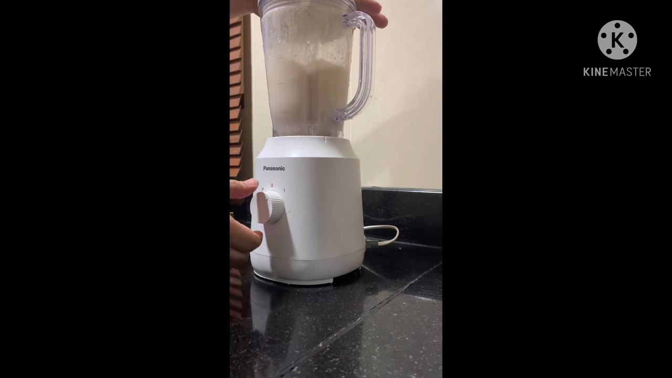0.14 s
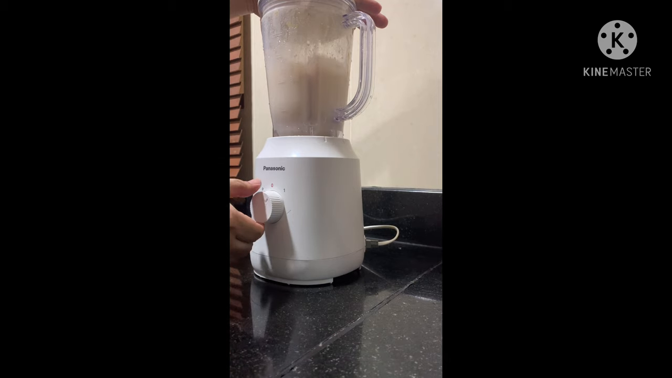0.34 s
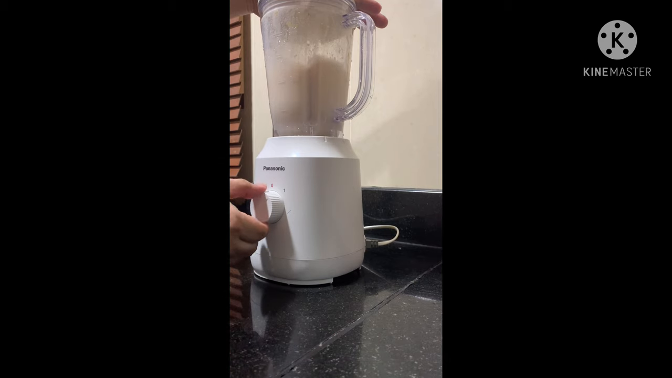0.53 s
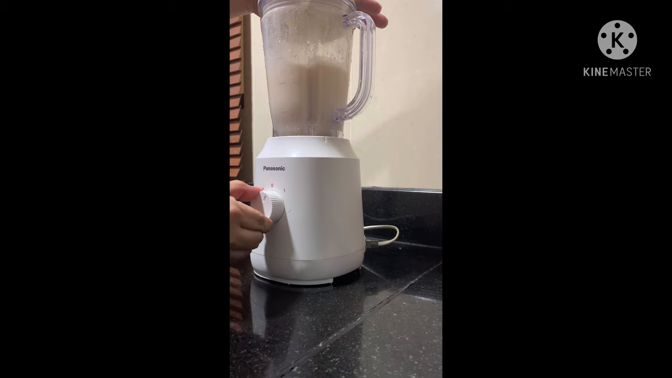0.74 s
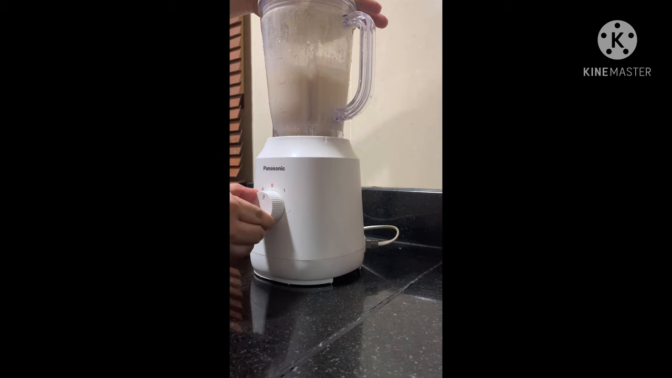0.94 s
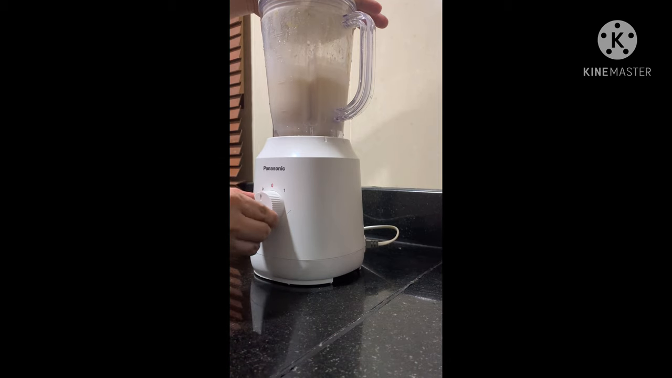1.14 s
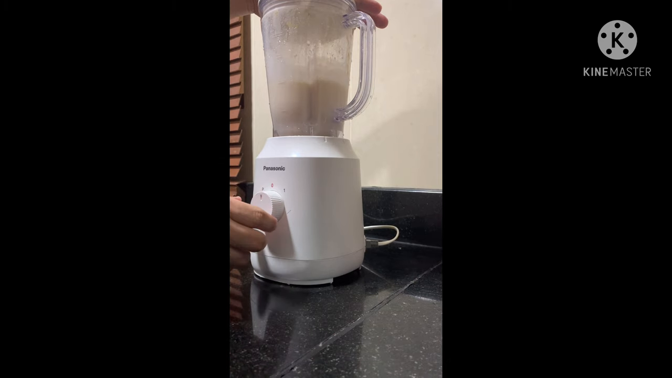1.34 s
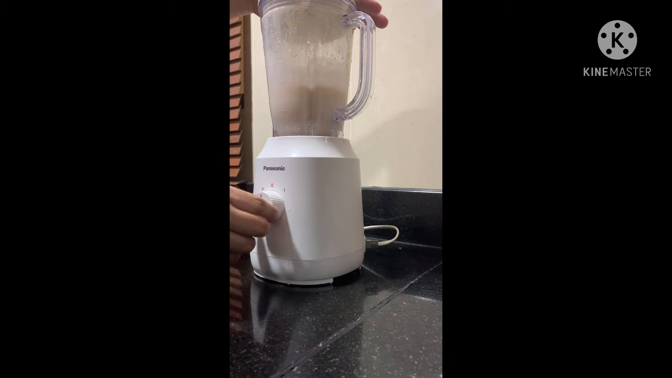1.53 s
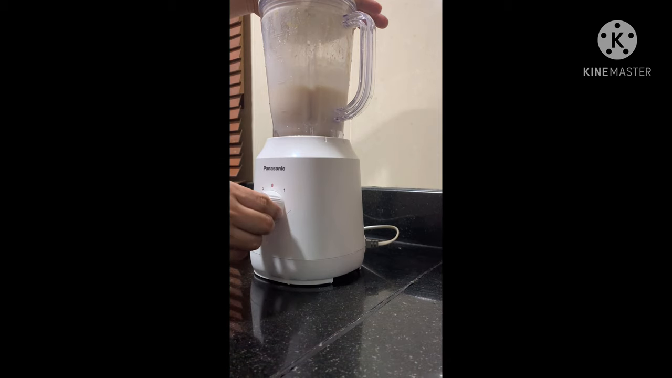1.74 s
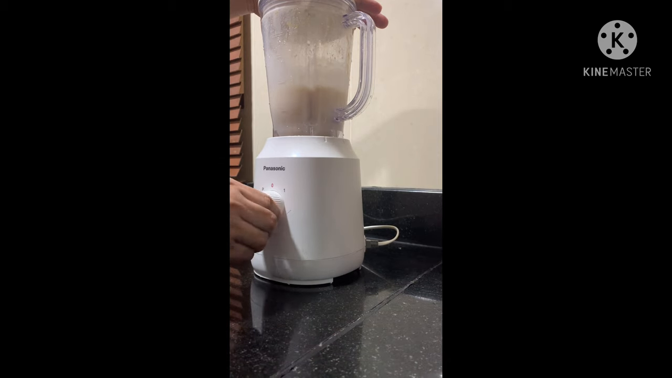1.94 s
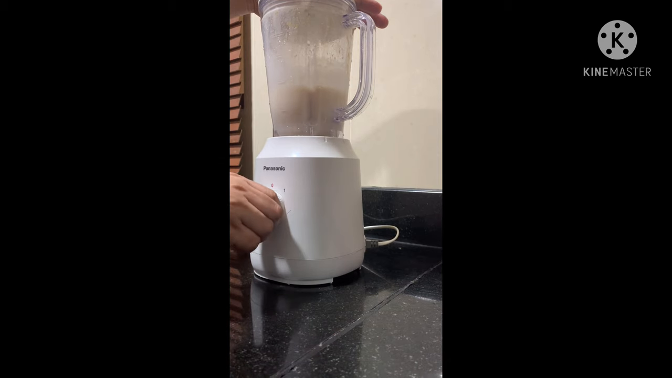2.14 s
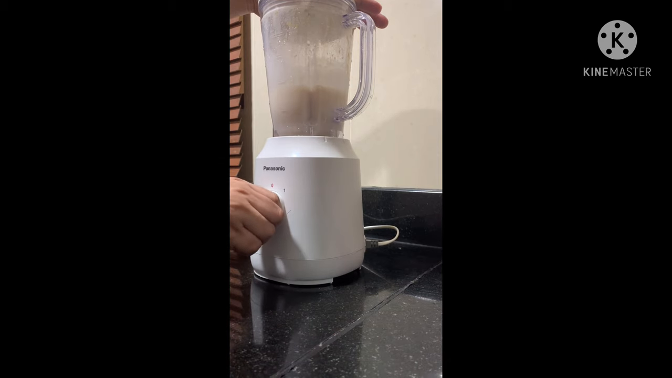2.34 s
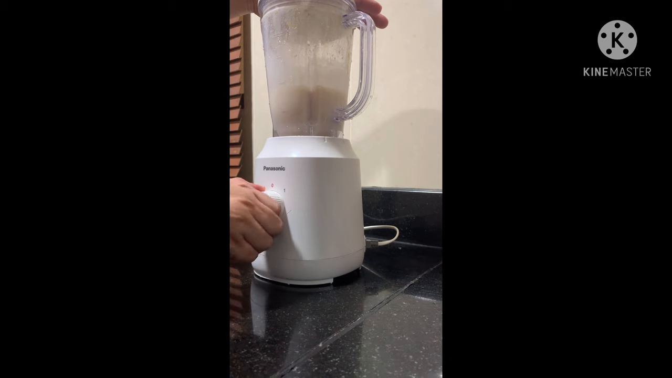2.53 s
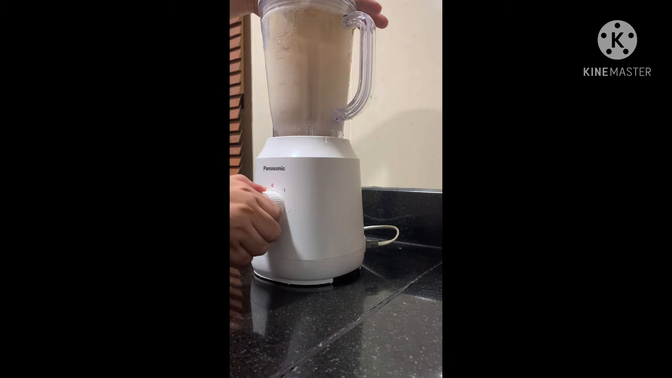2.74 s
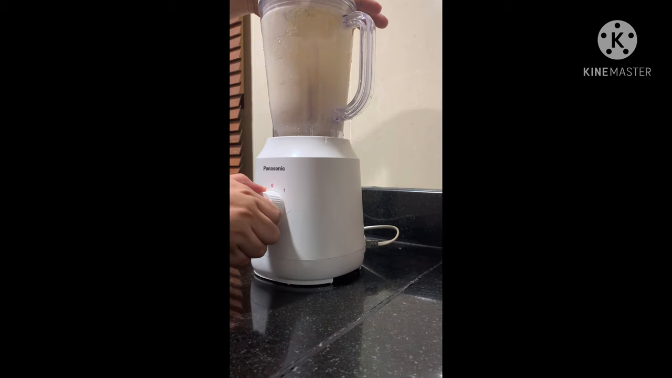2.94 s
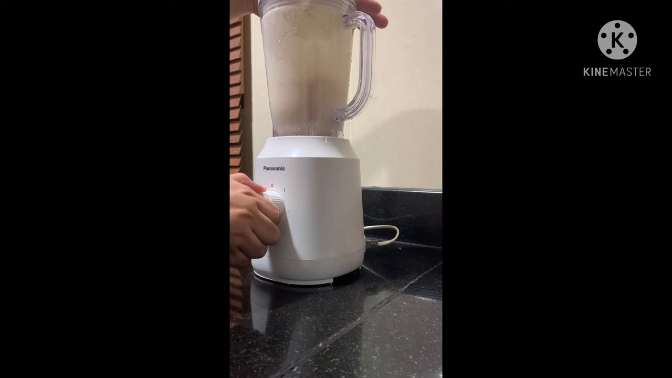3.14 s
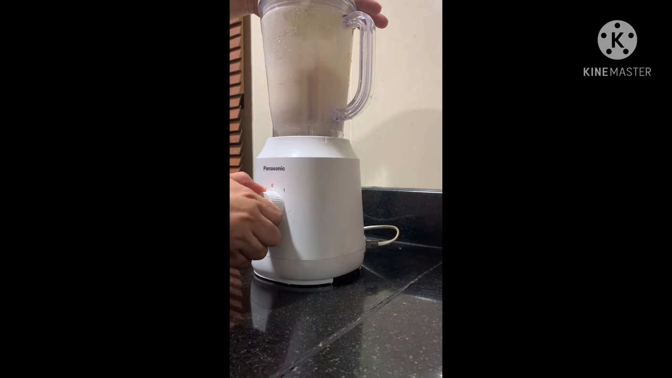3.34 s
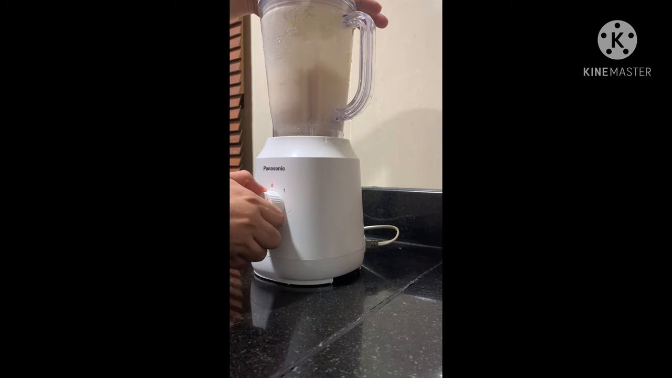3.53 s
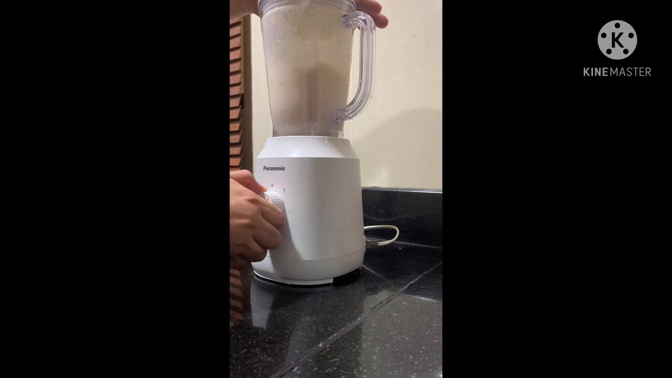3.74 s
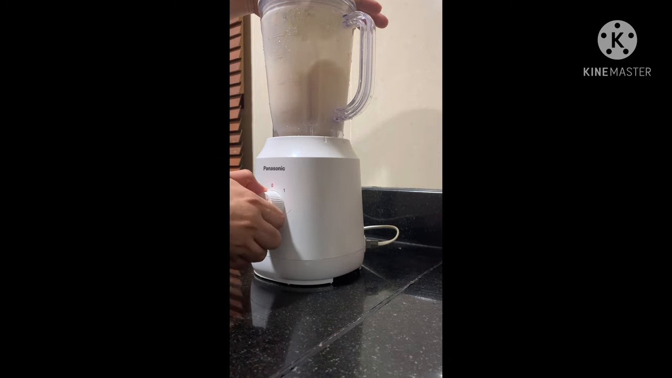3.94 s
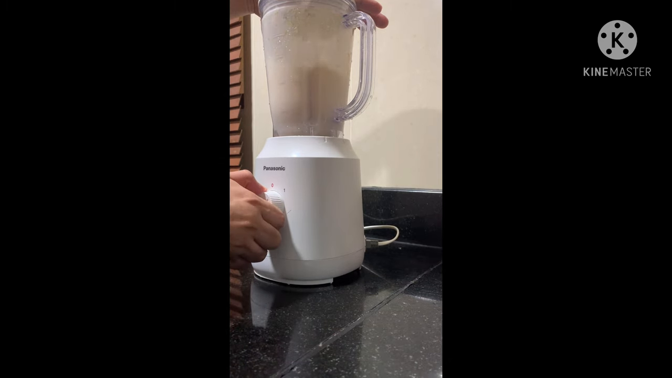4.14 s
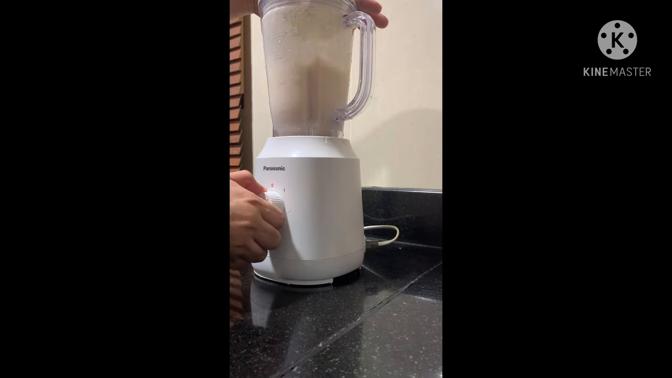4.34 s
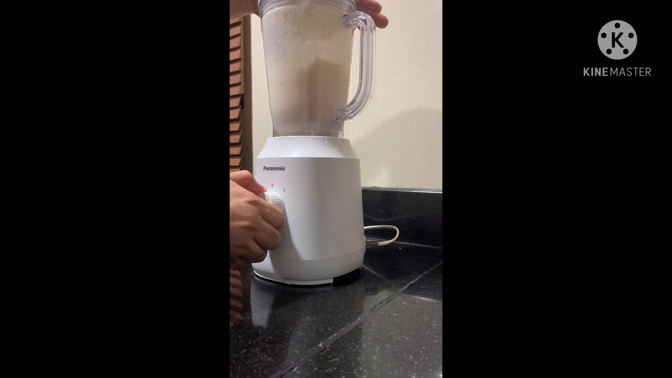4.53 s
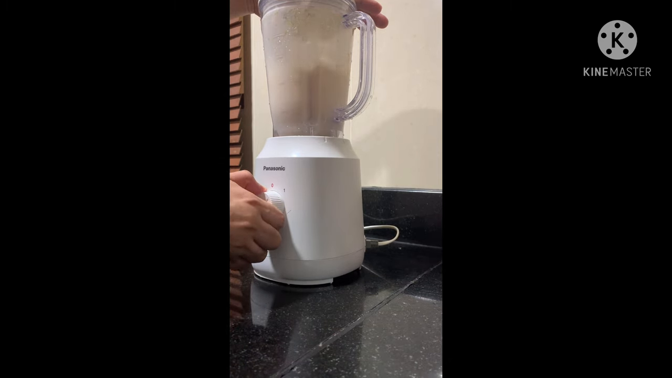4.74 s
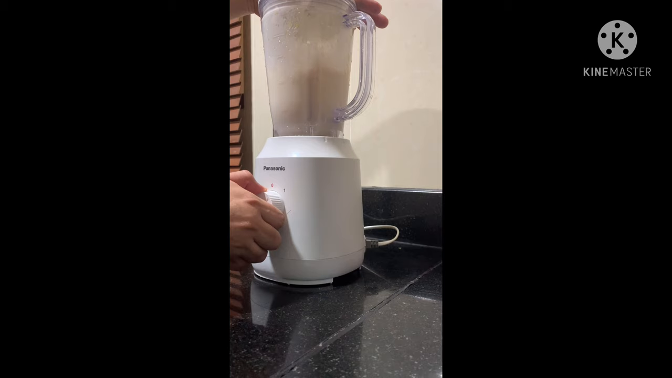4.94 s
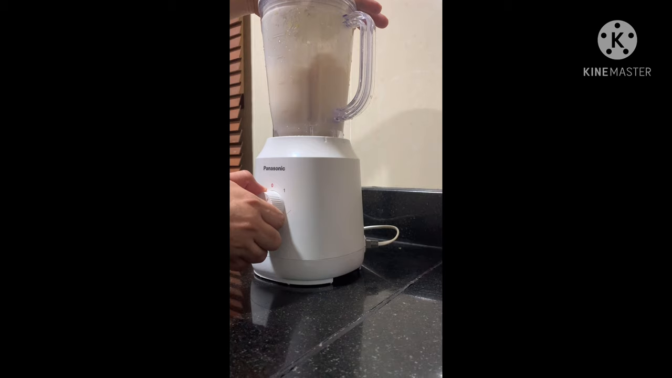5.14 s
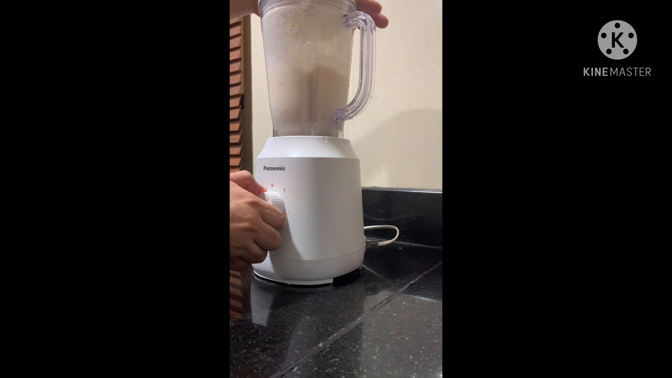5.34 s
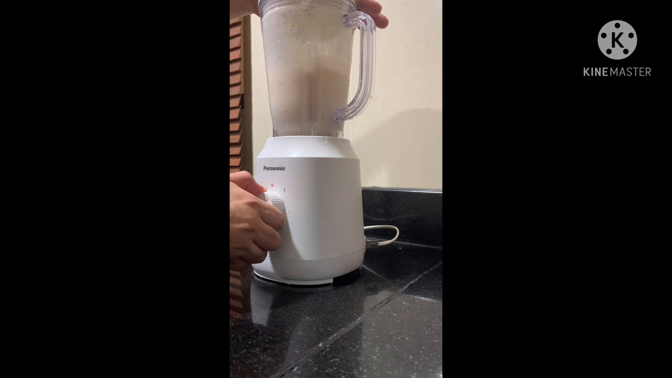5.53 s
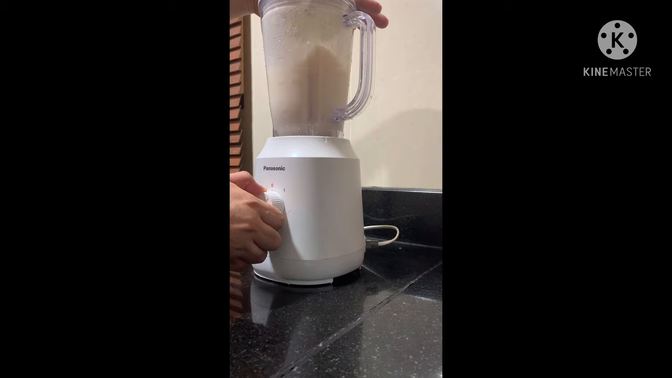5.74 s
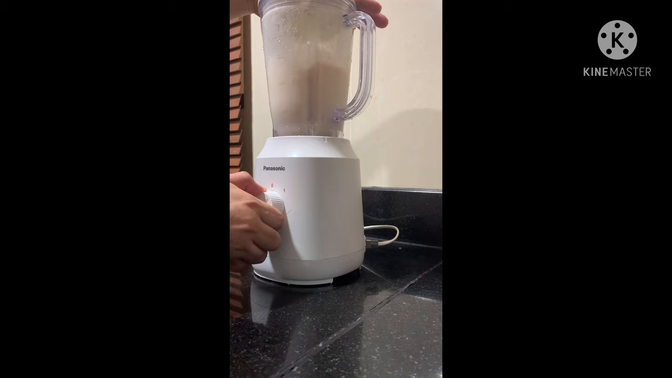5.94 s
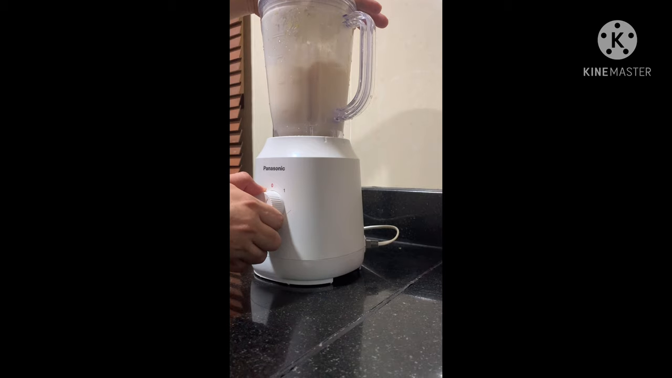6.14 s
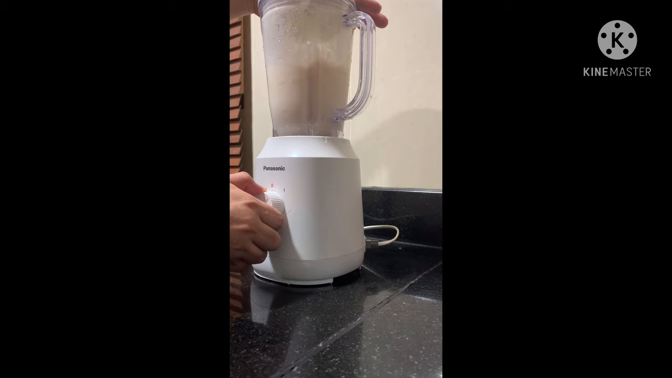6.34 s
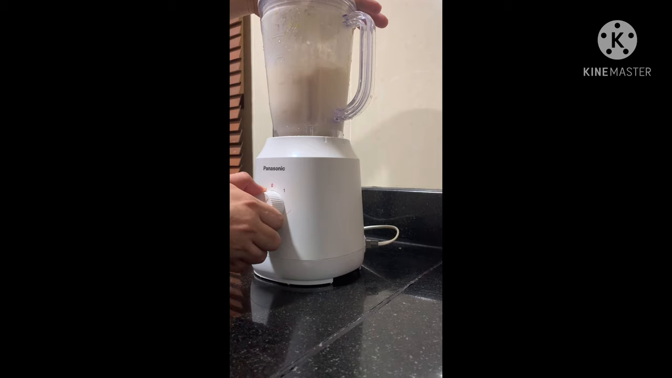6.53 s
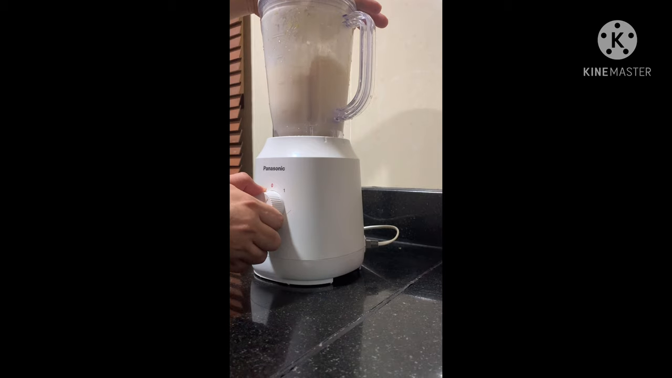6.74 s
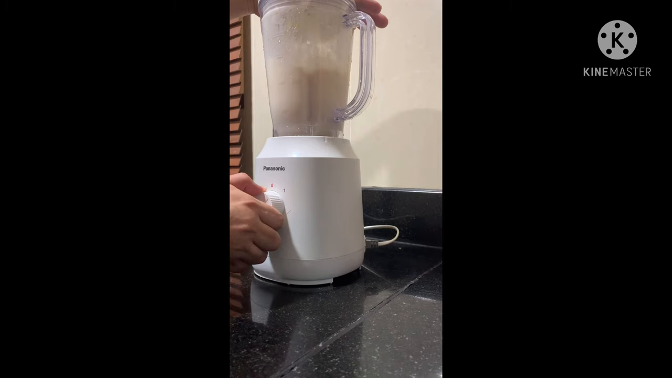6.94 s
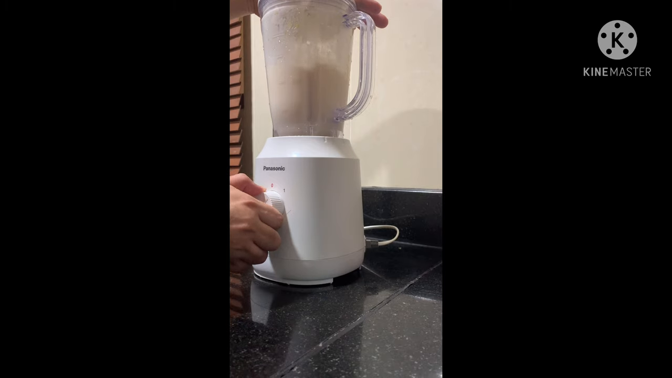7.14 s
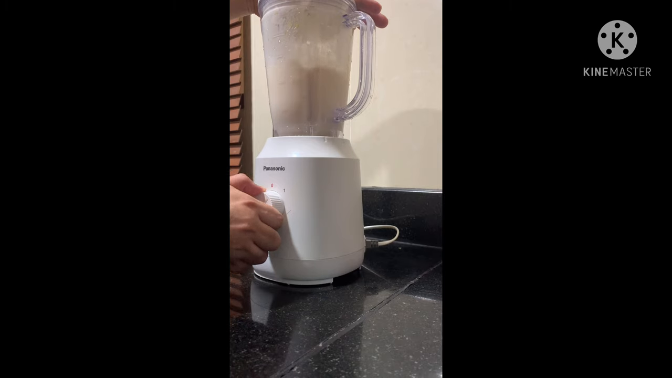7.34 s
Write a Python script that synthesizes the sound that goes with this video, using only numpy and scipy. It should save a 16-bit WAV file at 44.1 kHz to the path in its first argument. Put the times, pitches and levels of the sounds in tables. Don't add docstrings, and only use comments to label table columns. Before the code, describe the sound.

Close up in a small kitchen, a blender churns noisily with a buzzing motor and airy vent hiss. It is clicked off and coasts down over roughly a second, with a second plastic click during the slowdown. After a short near-silence with faint appliance hum, the knob snaps again, the feet hammer the counter in a quick burst, and the blender surges up to a fuller roar, held steadily. Thin bass, phone-like sound.

```python
import sys
import numpy as np
from scipy import signal
from scipy.fft import rfft, irfft, next_fast_len
from scipy.io import wavfile
from scipy.ndimage import uniform_filter1d

SR = 44100
rng = np.random.default_rng(int(sys.argv[2]) if len(sys.argv) > 2 else 0)


def decibels_to_gain(level_db):
    exponent = np.asarray(level_db, float) / 20
    return 10 ** exponent


def wav_out(sig):
    wavfile.write(sys.argv[1], SR, np.round(np.clip(np.atleast_2d(sig).T, -1, 1) * 32767).astype(np.int16))


N = 325017
T = np.arange(N) / SR
SIZE = next_fast_len(N + SR)
HZ = np.arange(SIZE // 2 + 1) * SR / SIZE + 1e-3

SWITCH_OFF_S, SWITCH_ON_S = 0.73, 2.557
FULL_HZ = 210.6
FIRST_RUN_DB = -4.5
FRESH_TAU_S = 3.6

# f/Hz, width/Hz, level/dB
HOUSING = [(259, 49, -6), (305.7, 47, 3.5), (332, 39, -2.5), (493.5, 43, -5.5), (657, 152, -5),
           (947, 45, -8.5), (1065, 120, -12.5), (1250, 177, -7.5), (1420, 20, -13.5)]


def unit(x):
    return x / np.sqrt(np.mean(x ** 2))


def over_hz(table, axis=1):
    table = np.array(table, float)
    return np.interp(np.log(HZ), np.log(table[:, 0]), table[:, axis])


def shape(x, gain):
    return irfft(rfft(x, SIZE) * gain, SIZE)[..., :N]


def above(hz, order=6):
    return 1 / np.sqrt(1 + (hz / HZ) ** (2 * order))


def band(lo_hz, hi_hz, order=6):
    return above(lo_hz, order) * np.sqrt(1 - above(hi_hz, order) ** 2)


def walk(rate):
    k = int(SR / rate)
    steps = np.repeat(rng.standard_normal(N // k + 1), k)
    return unit(uniform_filter1d(uniform_filter1d(steps, k), k)[:N])


def shaft():
    coast_delay_s, coast_tau_s, friction_hz = 0.015, 0.632, 80
    spin_tau_s, jerk_lead_s, jerk_s = 0.256, 0.058, 0.015
    creep_hz_per_s = 0.5
    free = np.maximum(T - SWITCH_OFF_S - coast_delay_s, 0)
    driven = np.maximum(T - SWITCH_ON_S, 0)
    coast = np.maximum((FULL_HZ + friction_hz) * np.exp(-free / coast_tau_s) - friction_hz, 0)
    spin = np.tanh((driven + jerk_lead_s) / spin_tau_s) * (1 - np.exp(-driven / jerk_s))
    return np.where(T < SWITCH_ON_S, coast, (FULL_HZ + creep_hz_per_s * driven) * spin)


def fresh_start(fresh_db):
    return np.where(T < SWITCH_ON_S, FIRST_RUN_DB, fresh_db * np.exp(-(T - SWITCH_ON_S) / FRESH_TAU_S))


def loudness(speed, hopping, full_db, power, fresh_db, hop_db, linger_db):
    pull_db = -10
    rub_db, stall_hz = -24.5, 24
    linger_db_per_s = -34
    first, ratio = T < SWITCH_ON_S, speed / FULL_HZ
    pull = ~first * decibels_to_gain(2 * pull_db) * np.clip(1 - ratio, 0, 1)
    turning = 1 / (1 + (stall_hz / (speed + 1e-6)) ** 4)
    linger = first * decibels_to_gain(2 * (linger_db + linger_db_per_s * np.maximum(T - SWITCH_OFF_S, 0)))
    work = (ratio ** (2 * power) + decibels_to_gain(2 * rub_db)) * turning
    return full_db + fresh_start(fresh_db) + hop_db * hopping + 10 * np.log10(work + pull + linger + 1e-12)


def sway(speed, hopping):
    sway_hz, sway_q = 126, 4.6
    shaft_db, hop_db, fresh_db = -42.5, 6, 2.5
    r = speed / sway_hz + 1e-6
    rocking = r ** 4 / ((1 - r ** 2) ** 2 + (r / sway_q) ** 2)
    return shaft_db + fresh_start(fresh_db) + hop_db * hopping + 10 * np.log10(rocking)


def body():
    # f/Hz, width/Hz, level/dB
    jar_and_vent_resonances = [(1710, 180, -11.5), (1838, 150, -4), (1761, 23, -4), (1950, 48, -1.2),
                               (2059, 69, -0.8), (2195, 73, -1.5), (2391, 98, -5.5), (2647, 67, -2),
                               (2781, 120, -5.5), (2989, 120, -5.5),
                               (3856, 1300, -10.5), (4704, 780, -8.5), (5956, 290, -12.5), (6850, 1000, -8),
                       (8200, 880, -8), (8590, 450, -12.5), (10180, 1100, -13)]
    # f/Hz, level/dB per Hz
    smooth_base = [(130, -16), (400, -22.5), (1200, -15), (3300, -20.5), (6500, -19.5), (9500, -12),
                   (12300, -14), (13300, -15), (14500, -19.5), (15500, -14.5)]
    # f/Hz, width/Hz, level/dB
    narrow_resonance = (425, 30, -1.5)
    power = decibels_to_gain(2 * over_hz(smooth_base))
    for hz, width, db in HOUSING + jar_and_vent_resonances + [narrow_resonance]:
        power += decibels_to_gain(2 * db) / (1 + (2 * (HZ - hz) / width) ** 2) ** (3 / 2)
    return np.sqrt(power)


def slush(ice_share, per_s=900, spread_db=1.5):
    size = decibels_to_gain(spread_db * np.minimum(rng.exponential(size=(2, N)), 3)) * rng.uniform(-1.31, 1, (2, N))
    ice = unit((rng.random((2, N)) < per_s / SR) * size)
    share = np.clip(ice_share, 0, 1)
    return np.sqrt(1 - share) * rng.standard_normal((2, N)) + np.sqrt(share) * ice


def motor_tones(speed, turn, powered, hopping, base_db):
    mains_hz, twice_db = 100, -16
    # shaft multiple, mains multiple, level/dB against the base rumble
    tone_list = [
        (2, 0, -16.5),
        (3, 0, -19),
        (0, 1, -15.5),
        (1, -1, -14.5),
        (1, 1, -10.5),
    ]
    tones = np.sqrt(2) * decibels_to_gain(sway(speed, hopping ** 2) + 1.1 * walk(18)) * np.sin(turn)
    tones += np.sqrt(2) * decibels_to_gain(sway(2 * speed, 0) + twice_db) * np.sin(2 * turn)
    for k, m, db in tone_list:
        wobble = decibels_to_gain(db + base_db - 11.0 * hopping ** 2 + 3.33 * walk(22))
        if m:
            wobble = wobble * powered
        tones += np.sqrt(2) * wobble * np.sin(k * turn + 2 * np.pi * m * mains_hz * T + 0.9 * walk(16))
    return tones


def base_rumble(turn, hopping, gain):
    hop = 0.93 * hopping
    each_turn = np.abs(np.diff((turn + 1.2 * walk(90)) // (2 * np.pi), prepend=0))
    knocks = each_turn * decibels_to_gain(7.1 * walk(150))
    knocks = unit(shape(knocks, gain * band(60, 1300, order=2) * HZ ** 0.15))
    steady = unit(shape(slush(0.068), gain * band(60, 1090)))
    return np.sqrt(1 - hop) * steady + np.sqrt(hop) * knocks


def jar_roar(speed, gain):
    ring = np.clip(speed / 200, 0, 1) ** 2.7
    wash = unit(shape(slush(0.17, per_s=210), band(980, 3600) / HZ ** 0.31))
    ringing = unit(shape(slush(0.19), gain * band(900, 3540)))
    return np.sqrt(ring) * ringing + np.sqrt(1 - ring) * wash


def fan_hiss(gain):
    return unit(shape(slush(0.22), gain * above(3600)))


def blender():
    feet_hz, feet_width_hz = 124, 68
    speed = shaft()
    turn = 2 * np.pi * np.cumsum(speed * (1 + 0.006 * walk(14))) / SR
    powered = uniform_filter1d(1. * ((T < SWITCH_OFF_S) | (T > SWITCH_ON_S)), 600)
    hopping = powered / (1 + (2 * (speed - feet_hz) / feet_width_hz) ** 4)
    base_db = loudness(speed, hopping ** 2, full_db=-35.5, power=0.9, fresh_db=1.5, hop_db=15.5, linger_db=-23.5)
    jar_db = loudness(speed, hopping ** 2, full_db=-29, power=1.84, fresh_db=0.25, hop_db=2, linger_db=-13)
    fan_db = loudness(speed, hopping ** 2, full_db=-28.5, power=2.16, fresh_db=0.44, hop_db=2, linger_db=-25.5)
    gain, surge = body(), walk(3.1)
    base = base_rumble(turn, hopping, gain) * decibels_to_gain(base_db + 1.5 + 0.5 * surge + 1.2 * walk(20))
    base = base + motor_tones(speed, turn, powered, hopping, base_db) + landings()
    jar = jar_roar(speed, gain) * decibels_to_gain(jar_db + 4.5 + 0.28 * surge + 0.5 * walk(17))
    fan = fan_hiss(gain) * decibels_to_gain(fan_db + 4.5 + 0.4 * surge + 0.5 * walk(13))
    return base, jar, fan


def idle_kitchen():
    # f/Hz, level/dB per Hz
    room_noise = [(15, -32.5), (25, 0), (53, 1), (71, -10.5), (103, -5.5), (172, -18.5), (450, -21.5),
                  (488, -21.5), (749, -34.5), (879, -28.5), (1760, -48.5), (15000, -63)]
    # f/Hz, level/dB
    far_hums = [(96.9, -73.5), (247.6, -75), (339.1, -78), (489.9, -81.5)]
    idle = unit(shape(rng.standard_normal((2, N)), decibels_to_gain(over_hz(room_noise)))) * decibels_to_gain(-57 + 1.7 * walk(9.8))
    for hz, db in far_hums:
        idle += decibels_to_gain(db + 3.0 + 2.5 * walk(6)) * np.sin(2 * np.pi * hz * T + 0.8 * walk(10))
    return idle


def knob():
    # t/s, ring level/dB, snap level/dB, treble level/dB, decay/s
    clicks = [(0.7261, -25.5, -22, -7.5, 0.012), (0.7305, -22.5, -20, -20, 0.018),
              (1.0147, -12.5, -23.5, -19.5, 0.024), (1.0199, -22, -23.5, -30.5, 0.03),
              (1.0257, -31.5, -29.5, -24, 0.017), (1.0285, -25.5, -25, -30, 0.015),
              (1.969, -65, -70, -99, .08), (2.055, -80, -80, -99, .12), (2.23, -82, -78, -99, .12),
              (2.5582, -11.5, -18, -21, 0.025), (2.562, -19, -18, -32, 0.014)]
    # f/Hz, level/dB
    knob_rings = [(720, -3.5), (1080, -2), (1800, -3.5), (2030, 3), (2700, -3.5), (3400, -5)]
    thump_db = -10
    scrape_db, scrape_s, scrape_lead_s = -15, 0.0065, 0.016
    out, t = np.zeros(N), np.arange(SR // 8) / SR
    snap = unit(shape(rng.standard_normal(N), band(600, 3700, order=4)))
    crack = unit(shape(rng.standard_normal(N), band(3300, 10400, order=3)))
    rings = sum(decibels_to_gain(d) * np.sin(2 * np.pi * hz * t) for hz, d in knob_rings) / 2
    for s, ring_db, snap_db, treble_db, decay_s in clicks:
        at = slice(int(s * SR), int(s * SR) + len(t))
        fade = np.exp(-np.log(1000) * t / decay_s) * np.minimum(t / 0.00089, 1)
        thump = decibels_to_gain(snap_db + thump_db) * np.sin(2 * np.pi * 305 * t) * np.exp(-t / 0.026)
        click = decibels_to_gain(ring_db) * rings + decibels_to_gain(snap_db) * snap[at] + decibels_to_gain(treble_db) * crack[at]
        out[at] += click * fade + thump
        swell = (T < s) * (T > s - scrape_lead_s) * np.exp(np.minimum(T - s, 0) / scrape_s)
        out += decibels_to_gain(scrape_db) * (decibels_to_gain(snap_db) * snap + decibels_to_gain(treble_db - 9.5) * crack) * swell
    return np.array([out, out])


def landings():
    # t/s, peak level/dB
    blows = [
        (2.632, -19),
        (2.654, -10),
        (2.676, -15),
        (2.691, -10),
        (2.7, -9.5),
        (2.728, -14),
    ]
    out, t = np.zeros(N), np.arange(SR // 10) / SR
    ring = np.zeros(len(t))
    for hz, width, db in HOUSING:
        ring += decibels_to_gain(db) * np.sqrt(width) * np.sin(2 * np.pi * hz * t) * np.exp(-np.pi * width * t)
    for s, db in blows:
        out[int(s * SR):][:len(t)] += decibels_to_gain(db) * ring / ring.max()
    return out


def ports(x, lag_s, dry=0.):
    # f/Hz, direct share (0-1), left minus right/dB
    port_table = [(60, 0.88, 0.9), (355.6, 0.98, -3.5), (500, 0.51, -10), (716, .75, -1.5), (900, 0, -1),
                  (2520, 0.42, -2), (3500, 0.5, -2), (3520, .12, -2), (5040, 0.31, -6.5), (5800, 0.4, -8),
                  (6700, 0.25, 2), (7900, 0.4, -1), (9300, 1, 0), (15850, 1, 0)]
    room_t60_s = 0.13
    share = np.clip(over_hz(port_table) + dry, 0, 1)
    t = np.arange(SR // 2) / SR
    echoes = rng.standard_normal((2, len(t))) * np.exp(-np.log(1000) * t / room_t60_s) * (t > 0.002)
    tail = rfft(echoes)
    even = irfft(tail / np.sqrt(np.abs(tail))) * np.exp(-np.log(1000) * (t / (2 * room_t60_s)) ** 4)
    tail = rfft(even, SIZE)
    tail = tail / np.sqrt(uniform_filter1d(np.abs(tail) ** 2, size=500))
    side = np.array([[1], [-1]]) / 2
    direct = np.exp(-2j * np.pi * HZ * lag_s * side)
    facing, walls = rfft(x, SIZE)
    both = np.sqrt(share) * direct * facing + np.sqrt(1 - share) * tail * walls
    return irfft(both * decibels_to_gain(over_hz(port_table, axis=2) * side), SIZE)[:, :N]


def scene():
    base, jar, fan = blender()
    heard = ports(base + idle_kitchen(), -0.000041)
    heard = heard + ports(jar, -0.00045) + ports(fan, 0.000214)
    return heard + ports(knob(), -0.00004, dry=0.64)


def roll_off(x):
    return signal.sosfilt(signal.butter(12, 16510, fs=SR, output="sos"), x)


def record(dry):
    top_hz = 15720
    treble_cut = 1 / np.sqrt(1 + (HZ / top_hz) ** 400)
    mix = shape(dry, above(55, order=4) * treble_cut)
    return roll_off(mix)


dry = scene()
out = record(dry)
wav_out(out)
```